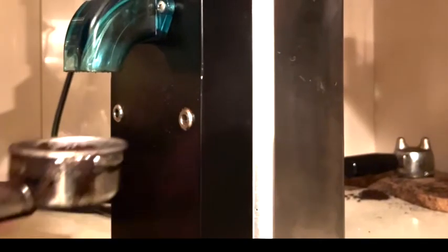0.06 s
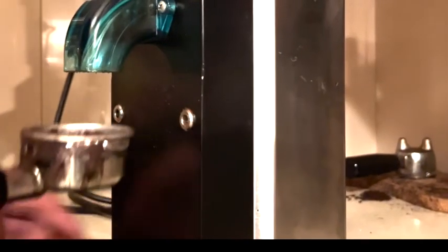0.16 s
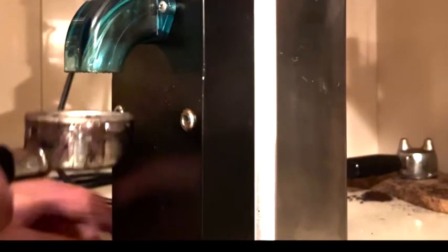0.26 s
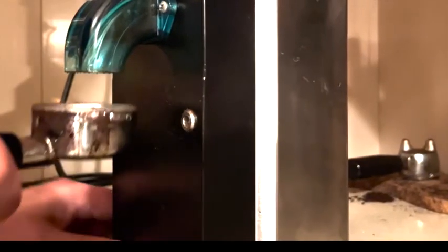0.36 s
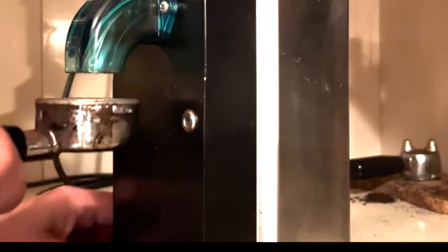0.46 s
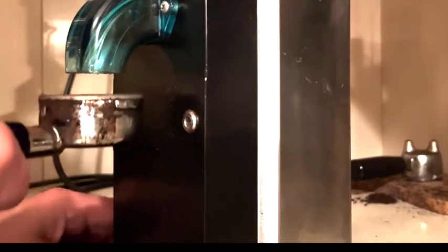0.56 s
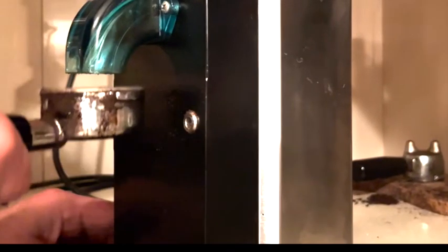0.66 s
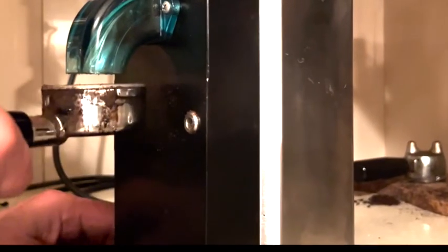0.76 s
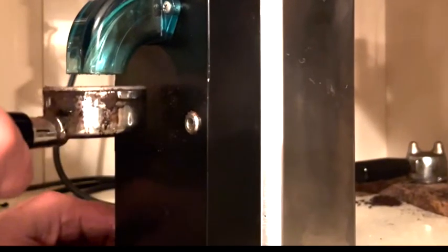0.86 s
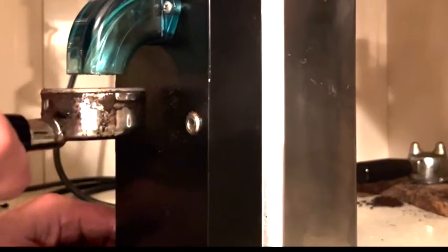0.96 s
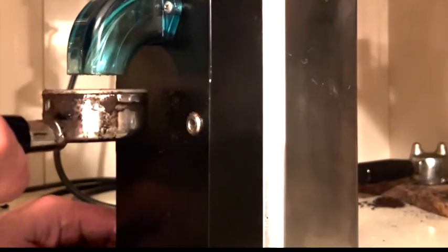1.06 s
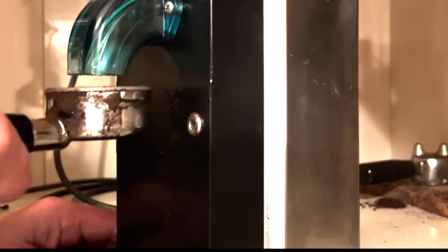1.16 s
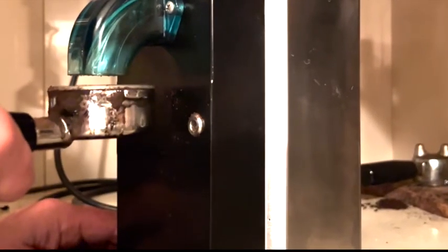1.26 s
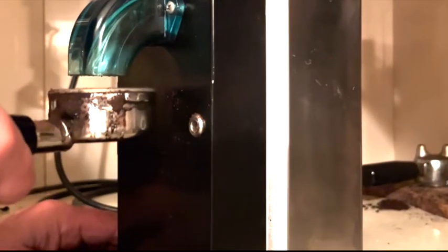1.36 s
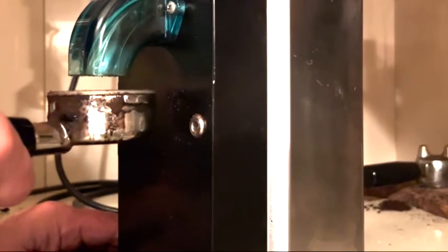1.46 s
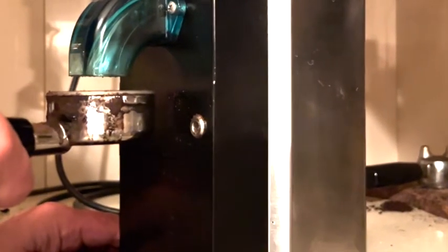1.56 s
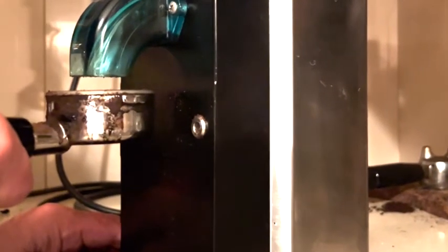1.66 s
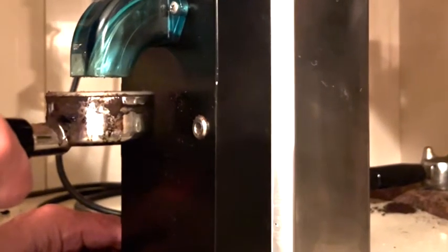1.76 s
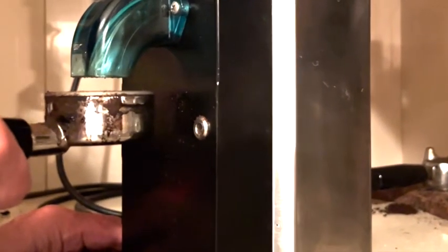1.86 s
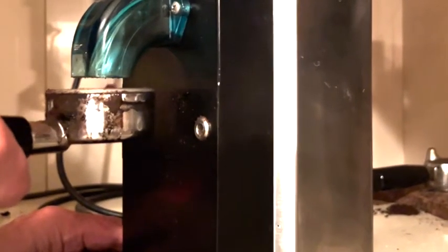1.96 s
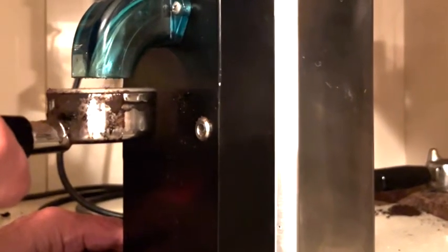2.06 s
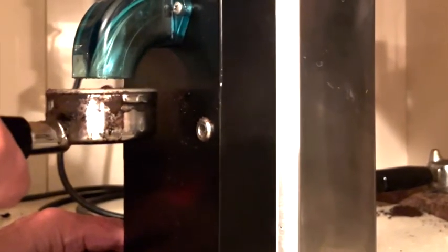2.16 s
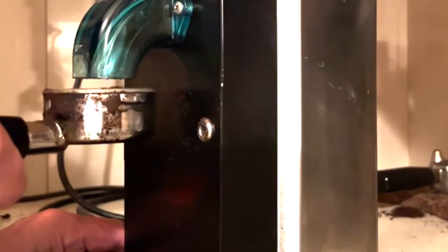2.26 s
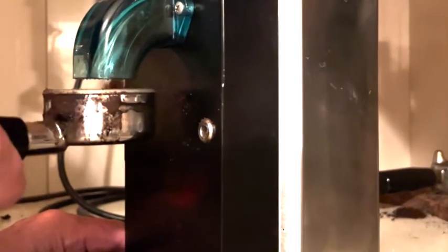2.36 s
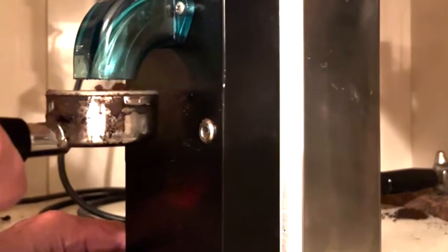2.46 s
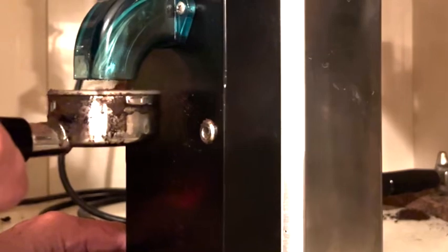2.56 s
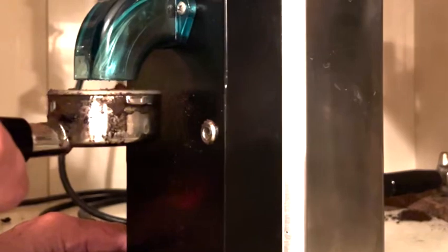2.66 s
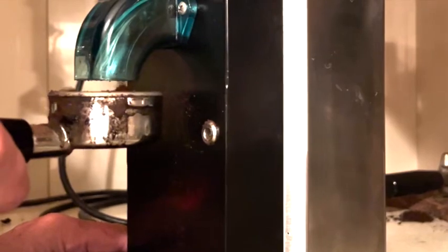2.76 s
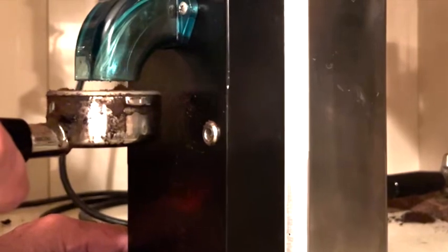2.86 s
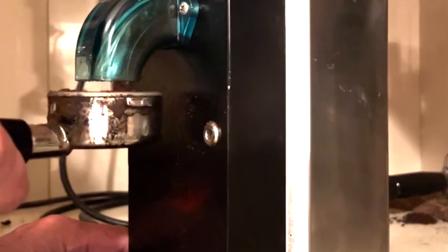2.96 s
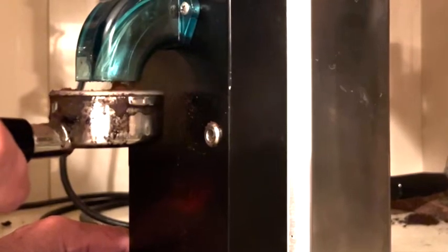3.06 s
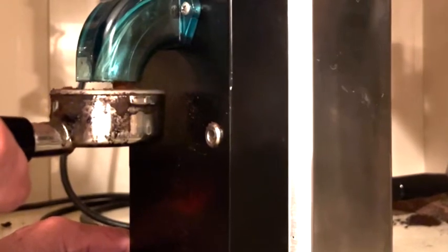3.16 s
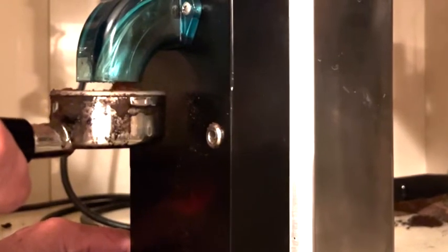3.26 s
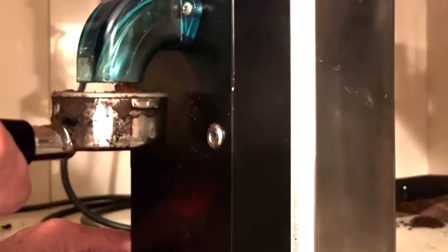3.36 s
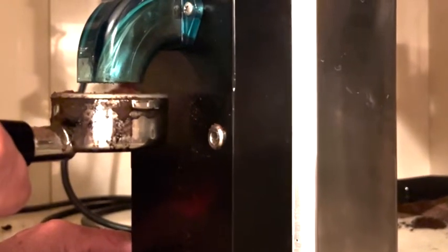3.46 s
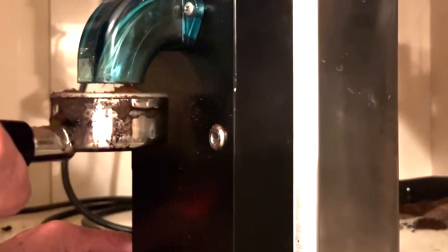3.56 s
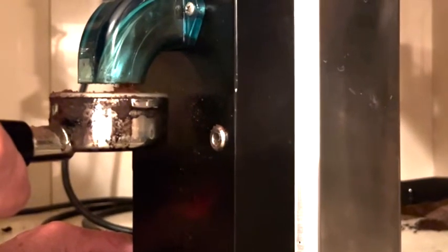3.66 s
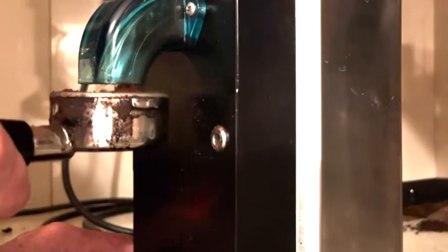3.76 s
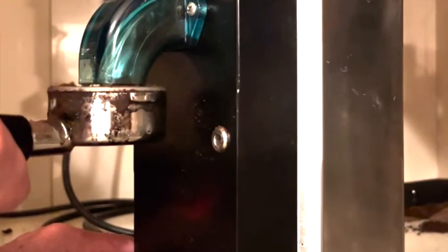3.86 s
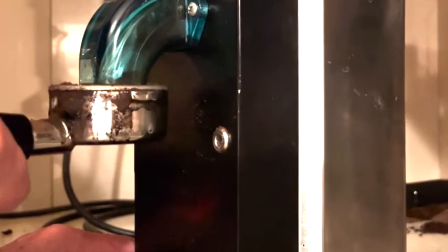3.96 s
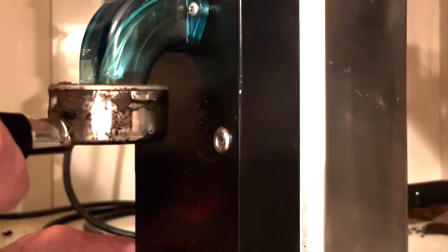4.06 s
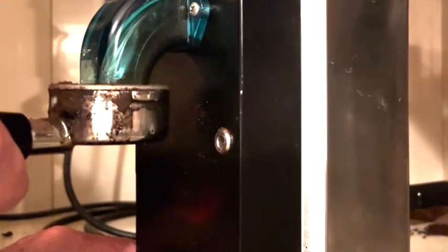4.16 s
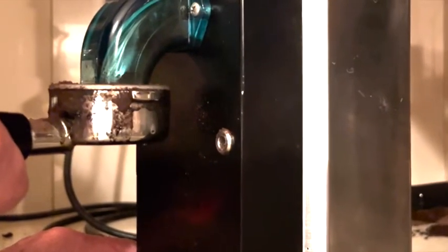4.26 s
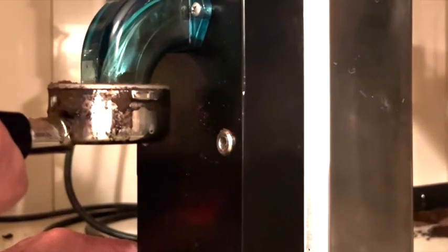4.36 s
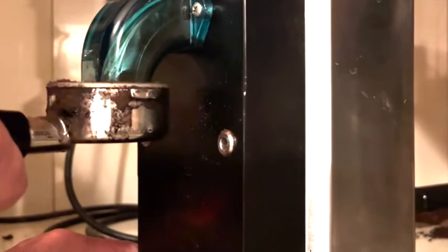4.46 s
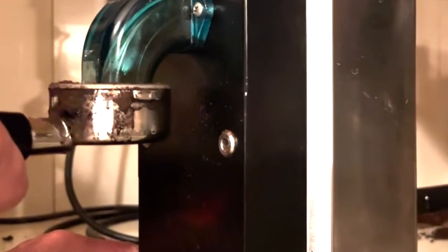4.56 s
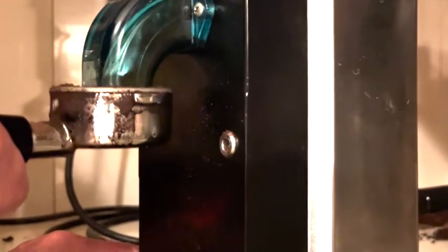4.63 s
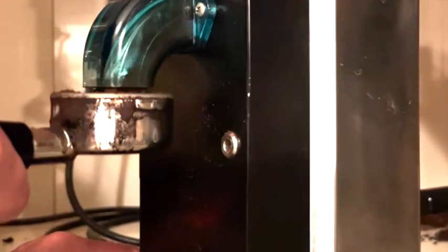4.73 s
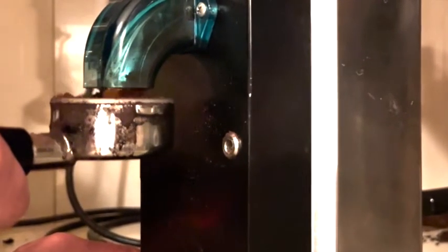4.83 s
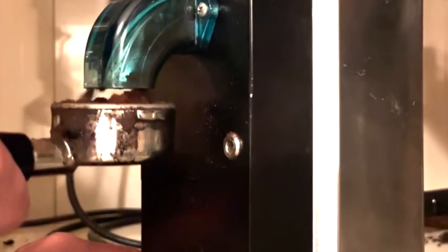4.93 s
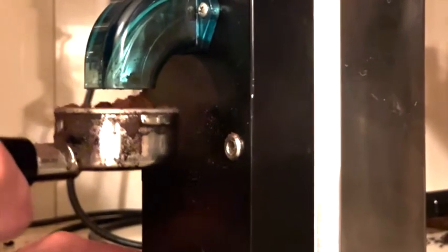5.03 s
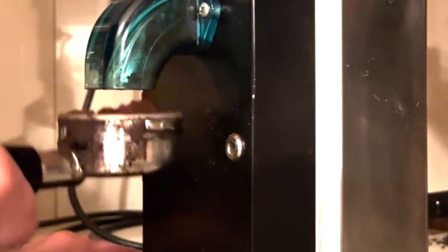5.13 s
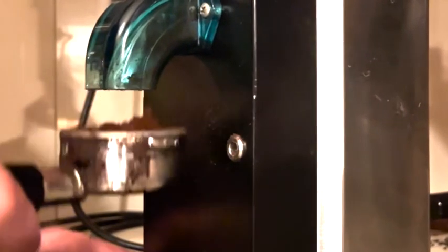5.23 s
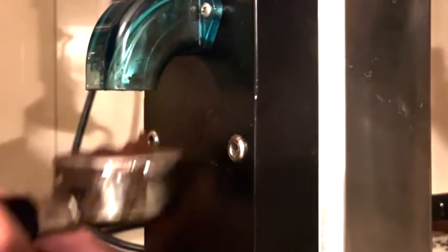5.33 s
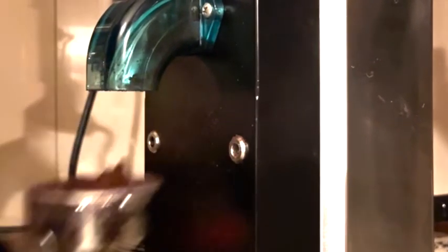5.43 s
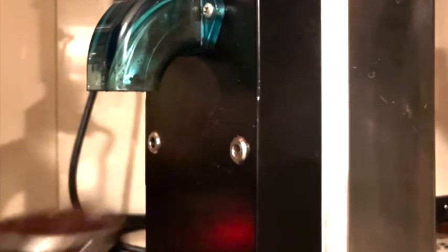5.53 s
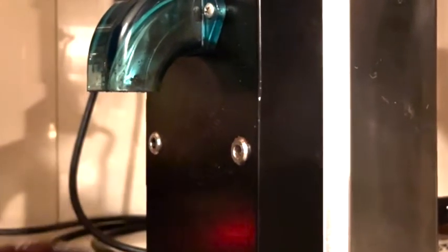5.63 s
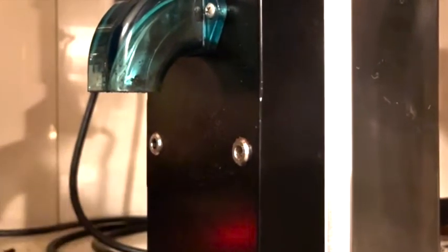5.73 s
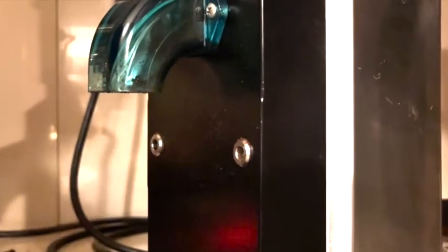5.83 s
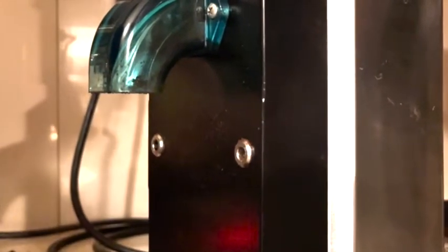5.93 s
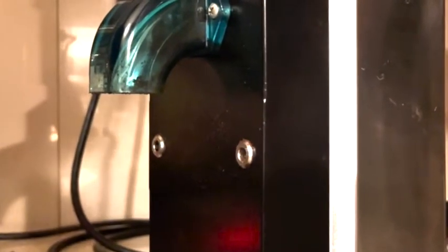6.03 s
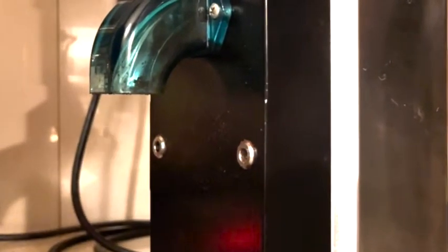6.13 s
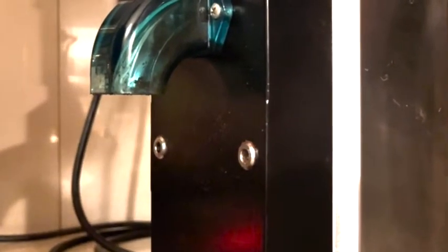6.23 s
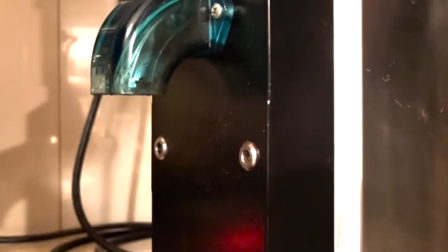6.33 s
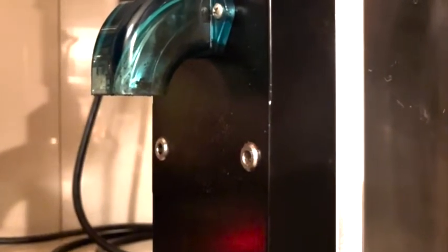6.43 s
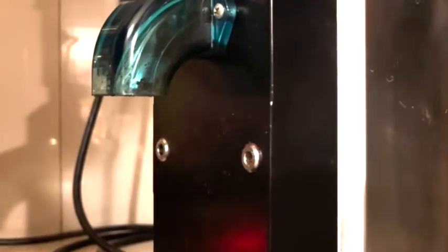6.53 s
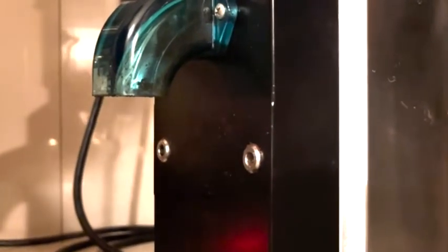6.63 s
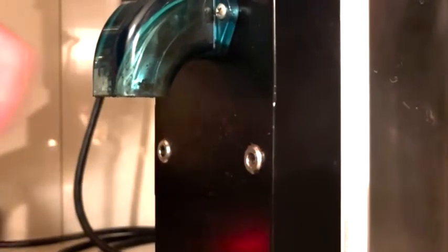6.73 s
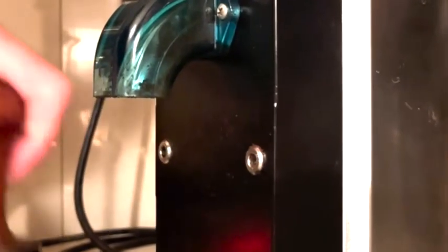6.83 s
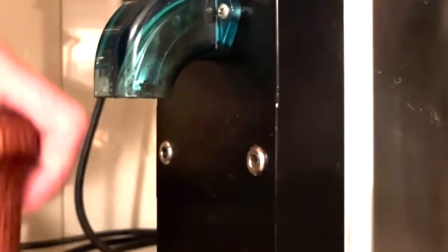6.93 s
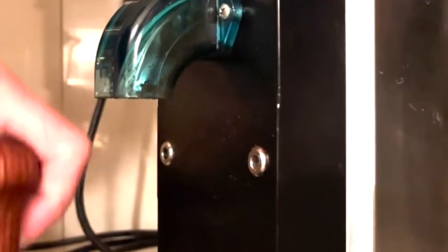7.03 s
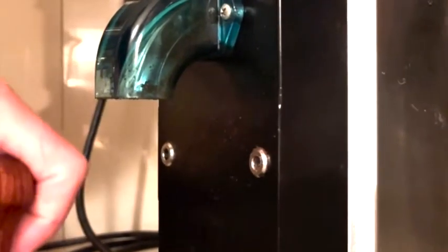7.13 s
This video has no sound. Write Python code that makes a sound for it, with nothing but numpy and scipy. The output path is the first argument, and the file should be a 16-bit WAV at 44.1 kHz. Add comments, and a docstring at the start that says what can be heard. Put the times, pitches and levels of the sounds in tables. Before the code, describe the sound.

In a quiet kitchen, a metal filter holder faintly scuffs and slides into place. A switch clicks and a burr grinder starts abruptly, crunching beans in a dense, loud rattle over hum and a throbbing whine. About three seconds later it clicks off and slows quickly into sparse crumbling. Soft counter thuds, hand shuffling and one small sharp metal knock follow. Close stereo microphone, slight hiss.

```python
"""An electric burr grinder, close to the microphone, fills a metal filter holder with coffee in a kitchen.
Random bean fractures shake housing resonances, and big cracks ring; a hum and a throbbing whine form the motor.
The holder slides in and a switch clicks; after three seconds the power is cut and the burrs coast to rest.
Soft thuds, shuffling hands and a small metal knock follow, over room rumble, faint tones and hiss."""
import sys
import numpy as np
from scipy import signal
from scipy.fft import rfft, irfft, next_fast_len
from scipy.io import wavfile

SR = 44100
rng = np.random.default_rng(int(sys.argv[2]) if len(sys.argv) > 2 else 0)


def pcm_store(signal):
    """Save signal as 16-bit PCM."""
    levels = np.round(np.clip(np.atleast_2d(signal), -1, 1) * 32767)
    wavfile.write(sys.argv[1], SR, levels.astype(np.int16).T)


N = 317079
TIME = np.arange(N) / SR   # s
SIZE = 2 * next_fast_len(N // 2 + SR // 4)   # transform length, with room for tails
FREQ = np.maximum(np.arange(SIZE // 2 + 1) * SR / SIZE, 1)   # Hz

# Table levels are relative: most sources add a gain of their own. Balance is left over right.

# loudest bean cracks, at the peak: (time [s], level [dB], housing pitch [Hz])
BEAN_CRACKS = [(1.568, -13.5, 535), (1.592, -11, 786), (1.604, -12.5, 580), (1.758, -7, 516),
               (1.779, -11, 500), (1.893, -12.5, 520), (1.994, -8.5, 749), (2.09, -8.5, 509),
               (2.146, -8, 760), (2.194, -10, 496), (2.28, -10.5, 679), (2.453, -9, 517),
               (2.502, -7.5, 562.3), (2.565, -9, 549.6), (2.658, -9, 517), (2.799, -13, 491),
               (2.817, -7, 555), (3.038, -10, 523), (3.147, -9.5, 490), (3.219, -9.5, 477),
               (3.252, -9.5, 820), (3.416, -12.5, 547), (3.484, -8, 560), (3.567, -12, 532),
               (3.68, -10, 785), (3.901, -12, 513), (4.087, -8.5, 563), (4.184, -9.5, 502),
               (4.29, -11.5, 575), (4.569, -8, 530), (4.692, -11, 520), (4.731, -15, 540),
               (4.751, -11, 543), (4.769, -12, 793), (4.786, -9, 522), (4.841, -9, 474), (4.89, -15.5, 478),
               (4.937, -15, 490), (4.975, -16.5, 517), (4.997, -22.5, 550), (5.03, -31, 463)]
# brittle beans snap with a bright crackle: (time [s], level [dB])
BEAN_SNAPS = [(1.752, -28), (1.988, -18.5), (2.06, -23), (2.498, -28.5), (2.59, -30), (2.68, -22),
              (2.945, -21.5), (3.134, -22.5), (3.245, -22), (3.445, -18.5), (3.476, -25.5), (3.558, -25),
              (3.669, -18.5), (3.732, -22.5), (3.96, -24.5), (4.112, -26.5), (4.181, -22.5), (4.261, -29)]
# how well the beans feed the burrs: (time [s], level [dB])
BEAN_FEED = [(1.6, 0.5), (1.84, 0), (1.95, -1.5), (2.07, 0.2), (3.7, 0.62), (4.45, 0), (4.66, -2.5),
             (4.83, -2.5)]
# brief changes, mostly lulls, in the flow of fragments: (time [s], level [dB])
FRAGMENT_LULLS = [(1.89, -1.5), (1.958, -2.5), (2.262, -1.5), (2.43, 0.5), (2.572, -2.5), (3.09, -3),
                  (3.378, -3.5), (4.247, 0), (4.495, -2), (4.622, -1.5)]
# housing and chute resonances, with broad bands of bright hiss at the top:
# (frequency [Hz], width [Hz], level [dB], balance [dB])
GRINDING_BANDS = [(251.7, 70, -22, 7), (360.6, 88, -13, 2.5), (408.3, 34, -4, 0.5), (491.4, 119, -3.5, 0.5),
                  (554, 154, -2.5, -4), (691, 44, -5, 0), (779, 120, -6.5, -1), (870, 95, -7.5, -1.5),
                  (1024, 98, -12.5, 2.5), (1262.5, 97, -10.5, -0.5), (1445, 130, -15, -6),
                  (1622, 72, -16.5, 2.5), (1764, 180, -22, 0.5), (2052, 320, -16, 0), (2310, 140, -16.5, 3),
                  (2513, 260, -17, -6.5), (2770, 34, -15, -3.5), (2966, 460, -19, 0.3),
                  (3426, 290, -22.5, -4.5), (3870, 274, -14.5, -3.5), (4133, 246, -13.5, -8.5),
                  (4477, 67, -18, -1), (4700, 330, -26.5, -7), (5360, 2000, -24.5, -3.5),
                  (7270, 940, -22.5, -1), (8240, 1030, -23.5, 0), (11100, 6600, -31.5, -1),
                  (14360, 1090, -27, 1.5), (15600, 1080, -20.5, -2)]
# the heavy body rocks on the counter: (frequency [Hz], width [Hz], level [dB], balance [dB])
BODY_MODES = [(74.2, 41, -20.5, 2.5), (131, 69, -19.5, -1)]
# single crumbs crushed while the burrs turn slowly: (time [s], level [dB])
CRUMB_CRUSHES = [(1.523, -46), (1.534, -32), (1.544, -38), (4.876, -43), (4.897, -42), (4.969, -32.5),
                 (5.0, -47), (5.026, -43), (5.042, -48), (5.069, -49), (5.076, -46)]
# gritty scrape of a crumb: (frequency [Hz], width [Hz], level [dB], balance [dB])
CRUMB_BANDS = [(820, 400, 11.5, -4.5), (2300, 1800, -1, -1), (4050, 900, -2, -5), (5620, 330, -1, -7),
               (7740, 2000, -6.5, -2), (13000, 6500, -13, 3)]
# magnetic hum: (multiple of twice the mains rate [1], level [dB])
HUM_PARTIALS = [(1, 0), (2, -19), (3, -9.5)]
# rotor whine, gliding up at the start, then wandering: (time [s], pitch [Hz], level [dB])
WHINE_TRACK = [(1.55, 945, -24), (1.583, 1180, -9), (1.601, 1259, 9), (1.618, 1345, -5), (1.68, 1336, 4),
               (1.76, 1360, -11), (1.84, 1380, 0.5), (1.98, 1378, -6.5), (2.15, 1376, 0), (2.53, 1372, 1),
               (2.7, 1374, -1), (2.95, 1361, 2), (3.43, 1338, -4.5), (3.5, 1383, -2.5), (3.6, 1351, 2),
               (3.8, 1368, 0), (4.38, 1369, -1.5), (4.62, 1384, -5)]
# octave of the whine, strong while the motor strains to start: (time [s], level below the whine [dB])
WHINE_OCTAVE_DROP = [(1.58, -5), (1.602, 6.5), (1.625, 17)]
# the switch snaps on and off: (time [s], level [dB])
SWITCH_SNAPS = [(1.5105, -48), (1.513, -27), (4.6555, -17.5)]
# switch resonances: (frequency [Hz], width [Hz], level [dB], balance [dB])
SWITCH_MODES = [(2200, 670, 2.5, 0), (3200, 560, 5, -10), (4300, 600, -4, -9), (5360, 700, -1, -9.5),
                (9000, 12000, -7, 1)]
# small metal contacts of the holder: (time [s], level [dB])
HOLDER_TICKS = [(0.386, -58), (0.3925, -51), (0.4594, -54), (0.468, -54), (0.4864, -56), (0.499, -54),
                (0.515, -54), (0.9078, -53), (5.722, -57), (5.778, -58), (6.105, -58), (6.4497, -51),
                (6.643, -57), (6.784, -60), (7.1387, -49.5)]
# the filter holder slides into place in short pushes, at the peak: (time [s], level [dB])
HOLDER_PUSHES = [(.32, -65.5), (.392, -71), (.495, -61)]
# filter holder resonances: (frequency [Hz], width [Hz], level [dB], balance [dB])
HOLDER_MODES = [(1500, 830, -7, 3), (2130, 340, 1, -2), (2760, 220, -1, -2), (3420, 380, 1.5, -3),
                (4200, 2400, -7, -6), (5440, 450, -6, 0), (7800, 1800, -7, -5), (11400, 4500, -6, 3)]
# dull shuffling of the hands at the counter, at the peak: (time [s], level [dB])
HAND_SHUFFLES = [(5.82, -56.5), (5.95, -53), (6.46, -59), (6.99, -66)]
# spectrum of the shuffling: (frequency [Hz], density [dB per Hz])
SHUFFLE_SPECTRUM = [(40, -13.5), (80, 13), (170, -2), (280, -2.5), (550, -16), (1300, -28.5), (3000, -38)]
# soft thuds on the counter: (time [s], level [dB])
COUNTER_THUDS = [(5.944, -38.5), (5.961, -53), (6.025, -48), (6.098, -48), (6.449, -53)]
# counter modes: (frequency [Hz], level [dB], t60 [s])
COUNTER_MODES = [(118.8, -4, 0.12), (239, -1.5, 0.13), (298, 0.5, 0.038), (386, -6, 0.041)]
# metal knock, a touch and then the full contact: (time [s], level [dB])
METAL_KNOCK = [(6.887, -52), (6.8925, -43.5)]
# ringing of the knocked metal: (frequency [Hz], level [dB], t60 [s])
METAL_MODES = [(1545, -10.5, .25), (3580, -15, .11), (3850, -11, .12), (4670, -9, 0.07), (7450, -7, 0.035)]
# clack of the metal contact itself: (frequency [Hz], width [Hz], level [dB], balance [dB])
CLACK_BANDS = [(1535, 220, 2, -9), (3840, 800, 4.5, -12), (4700, 700, 2, -8), (7700, 1400, -3, -2),
               (12000, 6000, -13, 2)]
# room rumble: (frequency [Hz], density [dB per Hz])
ROOM_SPECTRUM = [(25, -20), (40, -20.5), (60, -2), (85, -1), (125, -4), (160, -15.5), (240, -9.5),
                 (290, -15), (440, -13), (560, -18.5), (720, -28), (980, -23.5), (1700, -38), (5000, -38.5),
                 (9000, -66)]
# faint tones in the room, as narrow noise bands: (frequency [Hz], width [Hz], level [dB], balance [dB])
ROOM_TONE_BANDS = [(83.7, 11.7, -1, -1), (244, 19, -11.5, 14), (1305, 35, -22, 3), (1534, 31, -23, -13),
                   (4800, 190, -28, -7.5), (6500, 195, -32, -5.5)]
# how alike noise is at the two microphone ports: (frequency [Hz], likeness [0 to 1])
PORT_LIKENESS = [(60, 0.99), (200, 0.88), (600, 0.96), (1050, 0.44), (1400, 0.53), (2000, 0.8),
                 (2600, 0.65), (4200, 0.67), (5700, 0.14), (7200, 1), (15000, 1)]
# phase between the microphone ports: (frequency [Hz], left lead [rad])
PORT_LEAD = [(300, 0), (400, -0.45), (520, -0.65), (680, -0.8), (800, 0.26), (1000, 1.1), (1350, 0.5),
             (1550, 0.53), (1950, 0.22), (2300, -0.2), (4000, -1.06), (7300, 0.47), (9500, 2.5),
             (12000, 6.5), (16000, 11)]

START_S, POWER_OFF_S, STOP_S = 1.519, 4.666, 5.088   # burrs start, lose power, come to rest
SPIN_UP_S = 0.016   # time constant of the run-up
FILL_S, LULL_S = 0.073, 0.018   # fragments fill the burrs; half-length of a lull
CRACK_RISE_S = 0.0087   # a bean gives way over a few milliseconds
# amplitude goes as burr speed to these powers: body rumble, big pieces, fragments, fine grounds
RUMBLE_POWER, CRUNCH_POWER, GRIT_POWER, HISS_POWER = 2.4, 0.78, 1.6, 1.75
MAINS_HZ, HUM_ON_S, HUM_LINGER_S = 60, 1.612, 0.013   # the hum outlasts the power by a moment
THROB_PER_S, THROB_DIP_S, THROB_DEPTH = 9.92, 2.07, 0.215   # depth as a share of amplitude
RING_HZ, RING_T60_S = 1370, 1.9   # a metal part tuned near the whine
PUSH_RISE_S, PUSH_T60_S = 0.044, 0.72
SHUFFLE_RISE_S, SHUFFLE_T60_S = 0.11, 0.55
CUTOFF_HZ = 15800


def from_db(db):
    """Decibels to amplitude gain."""
    return 10 ** (np.asarray(db) / 20)


def rms_one(x):
    """Scale to rms 1."""
    return x / np.sqrt(np.mean(x ** 2) + 1e-20)


def in_time(rows):
    """Each column of a curve, joined by straight lines at every sample."""
    times, *columns = np.transpose(rows)
    return [np.interp(TIME, times, column) for column in columns]


def between(start, end, ramp):
    """A gate with sloping edges, half open at start and end."""
    return np.clip(np.minimum(TIME - start, end - TIME) / ramp + .5, 0, 1)


def over_hz(points):
    """A spectrum table joined on a log-frequency axis."""
    hz, value = np.transpose(points)
    return np.interp(np.log(FREQ), np.log(hz), value)


def filtered(x, response):
    """Apply a frequency response."""
    return irfft(rfft(x, SIZE) * response, SIZE)[..., :N]


def causal(gain):
    """The minimum-phase response with this gain: it rings only after it is struck."""
    cepstrum = irfft(np.log(gain + 1e-7), SIZE)
    cepstrum[..., 1:SIZE // 2] *= 2
    cepstrum[..., SIZE // 2 + 1:] = 0
    return np.exp(rfft(cepstrum))


def band_gain(bands):
    """Left and right gain of a set of steep-sided bands, narrow or broad, summed in power."""
    power = np.zeros((2, len(FREQ)))
    for hz, width, db, balance in bands:
        detune = (FREQ ** 2 - hz ** 2) / (FREQ * width)
        peak = from_db([[db + balance / 2], [db - balance / 2]])
        power += (peak / (1 + detune ** 2)) ** 2
    return np.sqrt(power)


def drift(rate):
    """Smooth random wander of rms 1, with this many knots per second."""
    knots = rng.standard_normal(int(N / SR * rate) + 2)
    return rms_one(np.interp(TIME * rate, np.arange(len(knots)), knots))


def stereo_noise(gain=1):
    """Coloured noise of rms 1; its likeness at the two ports varies with frequency."""
    alike = np.clip(over_hz(PORT_LIKENESS), 0, .995)
    mid, side = rfft(rng.standard_normal((2, SIZE)))
    pair = np.sqrt(1 + alike) * mid + np.sqrt(1 - alike) * side * [[1], [-1]]
    return rms_one(irfft(pair * gain, SIZE)[:, :N])


def clicks(events):
    """One impulse for each (time, level)."""
    out = np.zeros(N)
    for s, db in events:
        out[round(s * SR)] += from_db(db)
    return out


def fading(impulses, t60):
    """Each impulse starts an envelope that dies away by 60 dB in t60 seconds."""
    return signal.lfilter([1], [1, -from_db(-60 / (t60 * SR))], impulses + 1e-18)


def swells(events, rise, t60):
    """Each movement builds to its peak and dies away; overlaps add in power."""
    power = 0
    for s, db in events:
        attack = np.clip(1 + (TIME - s) / rise, 0, 1)
        decay = from_db(db - 60 * np.maximum(TIME - s, 0) / t60)
        power = power + (attack * decay) ** 2
    return np.sqrt(power)


def struck(impulses, modes):
    """Impulses set decaying sines ringing, with alternating sign from mode to mode."""
    out = 0
    for k, (hz, db, t60) in enumerate(modes):
        radius, angle = from_db(-60 / (t60 * SR)), 2 * np.pi * hz / SR
        poles = [1, -2 * radius * np.cos(angle), radius * radius]
        ringing = signal.lfilter([0, np.sin(angle)], poles, impulses + 1e-18)
        out = out + (-1) ** k * from_db(db) * ringing
    return out


def shake(bands, force):
    """A crackling noise force of the given strength passes through a set of bands."""
    gain = band_gain(bands)
    level_gain = gain / np.sqrt(np.mean(gain ** 2))
    return filtered(stereo_noise() * force, causal(level_gain))


def burr_speed():
    """Share of full speed: a quick run-up, then friction slows the burrs evenly once the power is cut."""
    run_up = 1 - np.exp(-np.maximum(TIME - START_S, 0) / SPIN_UP_S)
    return run_up * np.interp(TIME, [POWER_OFF_S, STOP_S], [1, 0])


def fractures(per_s, spread_db, t60):
    """Power, of mean 1, of short random fractures of uneven size, fewer as the burrs slow to half speed."""
    speed = np.maximum(burr_speed(), .5)
    born = rng.random(N) < per_s * speed / SR
    sizes = from_db(spread_db * np.clip(rng.standard_normal(N), -2, 1))
    # dividing by speed leaves the average power to the speed laws in grinding()
    power = fading(born * sizes ** 2 / speed, t60 / 2)
    return power / power.mean()


def grinding(rumble_db, crunch_db, grit_db, hiss_db, crack_db, crack_grit_db, crack_hiss_db, crack_t60,
             crunch_share, grit_share, hiss_share, surge_db, flow_db, snap_db, snap_t60, snap_hiss_db):
    """Beans break between the burrs: big pieces drive the low bands, fragments mostly the higher ones."""
    speed = burr_speed()
    feed = from_db(in_time(BEAN_FEED)[0] + surge_db * drift(rate=30))

    # fragments take a moment to fill the burrs, then pass in short spurts
    filling = np.clip((TIME - START_S) / FILL_S, 0, 1)
    lull_db = sum(db * np.exp(-((TIME - s) / LULL_S) ** 2) for s, db in FRAGMENT_LULLS)
    flow = from_db(flow_db * drift(rate=24)) * filling * from_db(lull_db)

    beans = fractures(per_s=600, spread_db=2.5, t60=0.022)
    fragments = fractures(per_s=3000, spread_db=0.0, t60=0.007)
    snaps = fading(clicks(BEAN_SNAPS), snap_t60) * from_db(snap_db)
    crack_onsets = [(s - CRACK_RISE_S / 2, db) for s, db, _ in BEAN_CRACKS]
    cracks = fading(clicks(crack_onsets), crack_t60)

    deep = [band for band in BODY_MODES + GRINDING_BANDS if band[0] < 300]
    low = [band for band in GRINDING_BANDS if 300 <= band[0] < 1150]
    middle = [band for band in GRINDING_BANDS if 1150 <= band[0] < 5100]
    high = [band for band in GRINDING_BANDS if band[0] >= 5100]

    rumble = from_db(rumble_db) * speed ** RUMBLE_POWER
    crunch = from_db(crunch_db) * speed ** CRUNCH_POWER
    grit = from_db(grit_db) * flow * speed ** GRIT_POWER
    hiss = from_db(hiss_db) * flow * speed ** HISS_POWER
    low_burst = from_db(crack_db) * cracks
    middle_burst = from_db(crack_grit_db) * speed * cracks + snaps
    high_burst = from_db(crack_hiss_db) * speed * cracks + from_db(snap_hiss_db) * snaps

    stages = [(deep, rumble, crunch_share, 0),
              (low, crunch, crunch_share, low_burst),
              (middle, grit, grit_share, middle_burst),
              (high, hiss, hiss_share, high_burst)]
    out = 0
    for bands, level, share, burst in stages:
        # share: how closely this stage follows the big fractures
        breaking = share * beans + (1 - share) * fragments
        power = (feed * level) ** 2 * breaking + burst ** 2
        out = out + shake(bands, np.sqrt(power))
    return out


def shifting(x, depth_db, rate):
    """Each fragment breaks at another spot, so the treble bands swell and fade one by one."""
    spectrum, out = rfft(x, SIZE), x
    for hz in 1700 * 2 ** (np.arange(8) / 2.5):
        window = np.maximum(1 - np.abs(np.log2(FREQ / hz)) * 2.5, 0)
        band = irfft(spectrum * window, SIZE)[:, :N]
        swell = rms_one(from_db(depth_db * drift(rate)))
        out = out + band * (swell - 1)
    return out


def crack_rings(level_db, t60, rough):
    """Each big crack jolts the housing into a short, rough ring at a pitch of its own."""
    out = np.zeros(N)
    wobble = rough * drift(rate=250)   # phase, rad
    for s, db, hz in BEAN_CRACKS:
        near = slice(round((s - CRACK_RISE_S) * SR), round(s * SR) + SR // 8)
        t = TIME[near] - s
        attack = np.clip(1 + t / CRACK_RISE_S, 0, 1)
        decay = from_db(db - 60 * np.maximum(t, 0) / t60)
        phase = 2 * np.pi * hz * t + wobble[near] + rng.uniform(0, 2 * np.pi)
        out[near] += attack * decay * np.sin(phase)
    return from_db(level_db) * out


def crumbs(level_db, t60, rough_db):
    """Slow burrs crush crumbs one at a time, each in a short rough scrape."""
    force = fading(clicks(CRUMB_CRUSHES), t60) * from_db(rough_db * drift(rate=400))
    return from_db(level_db) * shake(CRUMB_BANDS, force)


def motor(hum_db, hum_flutter_db, whine_db, whine_rough, whine_pan_db, ring_db):
    """Hum at twice the mains rate and a throbbing rotor whine; a metal part rings on after the power cut."""
    hum = 0
    for multiple, db in HUM_PARTIALS:
        phase = 2 * np.pi * 2 * MAINS_HZ * multiple * TIME + rng.uniform(0, 2 * np.pi)
        hum = hum + from_db(db) * np.sin(phase)
    hum = np.sqrt(2) * hum * from_db(hum_db + hum_flutter_db * drift(rate=43))
    hum = hum * between(HUM_ON_S, POWER_OFF_S + HUM_LINGER_S, ramp=0.04)

    whine_hz, load_db = in_time(WHINE_TRACK)
    turn = np.exp(2j * np.pi * np.cumsum(whine_hz) / SR)
    tone = turn + from_db(-in_time(WHINE_OCTAVE_DROP)[0]) * turn ** 2   # squaring doubles the pitch
    waver = 1 + whine_rough * (drift(rate=45) + 1j * drift(rate=30))   # in level and phase
    # the whine throbs evenly as the burrs turn
    throb = 1 - THROB_DEPTH * np.cos(2 * np.pi * THROB_PER_S * (TIME - THROB_DIP_S))
    whine = np.sqrt(2) * from_db(whine_db + load_db) * throb * (tone * waver).real
    whine = whine * between(START_S, POWER_OFF_S, ramp=0.022)

    ring = struck(clicks([(POWER_OFF_S, ring_db)]), [(RING_HZ, 0, RING_T60_S)])
    return hum + whine * from_db([[whine_pan_db / 2], [-whine_pan_db / 2]]) + ring


def switch(level_db, t60):
    """Short snaps shake the resonances of the switch housing."""
    return from_db(level_db) * shake(SWITCH_MODES, fading(clicks(SWITCH_SNAPS), t60))


def handling(tick_db, tick_t60, slide_db, catch_db, thud_db, shuffle_db):
    """The holder scuffs, catches and slides; hands shuffle and set things down on the counter."""
    scuffs = from_db(tick_db) * fading(clicks(HOLDER_TICKS), tick_t60)
    slide = from_db(slide_db) * swells(HOLDER_PUSHES, PUSH_RISE_S, PUSH_T60_S)
    catching = from_db(catch_db * drift(rate=110))
    rubbing = shake(HOLDER_MODES, scuffs + slide * catching)
    shuffle = stereo_noise(from_db(over_hz(SHUFFLE_SPECTRUM)))
    shuffle = shuffle * swells(HAND_SHUFFLES, SHUFFLE_RISE_S, SHUFFLE_T60_S)
    thuds = struck(clicks(COUNTER_THUDS), COUNTER_MODES)
    return rubbing + from_db(shuffle_db) * shuffle + from_db(thud_db) * thuds


def knock(ring_db, clack_db, clack_t60, tail_db, tail_t60):
    """Metal meets a hard surface: a rattly clack, a brief ring and a soft diffuse tail."""
    blows = clicks(METAL_KNOCK)
    force = fading(blows, clack_t60) + from_db(tail_db) * fading(blows, tail_t60)
    ring = struck(blows, METAL_MODES)
    return from_db(ring_db) * ring + from_db(clack_db) * shake(CLACK_BANDS, force)


def kitchen(x, wet_db, t60):
    """Close tiled walls add a short diffuse tail, made of decaying noise that starts after 3 ms."""
    tail = stereo_noise() * from_db(-60 * TIME / t60) * (TIME > .003)
    tail /= np.sqrt(np.sum(tail ** 2) / 2)
    return x + from_db(wet_db) * filtered(x, rfft(tail, SIZE))


def background(rumble_db, tones_db, hiss_db):
    """Room rumble, faint appliance tones as narrow noise bands, and microphone hiss."""
    rumble = from_db(rumble_db) * stereo_noise(from_db(over_hz(ROOM_SPECTRUM)))
    tones = from_db(tones_db) * stereo_noise(band_gain(ROOM_TONE_BANDS))
    hiss = from_db(hiss_db) * stereo_noise()
    return rumble + tones + hiss


def scene():
    """The grinder, the hands at work and the room; the wall tail is added to all but motor and background."""
    beans = grinding(rumble_db=-48.5, crunch_db=-25.0, grit_db=-27.5, hiss_db=-32,
                     crack_db=-15.5, crack_grit_db=-20.0, crack_hiss_db=-27.5, crack_t60=0.081,
                     crunch_share=0.4, grit_share=0.13, hiss_share=0.14, surge_db=0.5, flow_db=-0.05,
                     snap_db=-5.5, snap_t60=0.07, snap_hiss_db=-14)
    beans = shifting(beans, depth_db=1.3, rate=60)
    rings = crack_rings(level_db=-8.5, t60=0.055, rough=0.75)
    beans = beans + rings * from_db([[-1], [1]])   # rings lean to the right
    beans = beans + crumbs(level_db=-1.5, t60=0.057, rough_db=3)
    drive = motor(hum_db=-35.5, hum_flutter_db=-0.24, whine_db=-35.5, whine_rough=0.29,
                  whine_pan_db=7.0, ring_db=-54.0)
    snaps = switch(level_db=-5.0, t60=0.042)
    hands = handling(tick_db=-10.5, tick_t60=0.057, slide_db=-3.0, catch_db=2.5,
                     thud_db=-3.0, shuffle_db=2.0)
    metal = knock(ring_db=-5.0, clack_db=-9.5, clack_t60=0.037, tail_db=-17, tail_t60=0.25)
    room = background(rumble_db=-56.4, tones_db=-65.0, hiss_db=-70)
    return kitchen(beans + snaps + hands + metal, wet_db=-9.5, t60=0.16) + drive + room


def record(dry):
    """The two microphone ports hear each pitch with a phase offset; a steep low-pass cuts the top."""
    ports = np.exp(1j * over_hz(PORT_LEAD) * np.array([[0], [-1]]))
    low_pass = 1 / np.sqrt(1 + (FREQ / CUTOFF_HZ) ** 240)
    return filtered(dry, ports * low_pass)


dry = scene()
out = record(dry)
pcm_store(out)
```